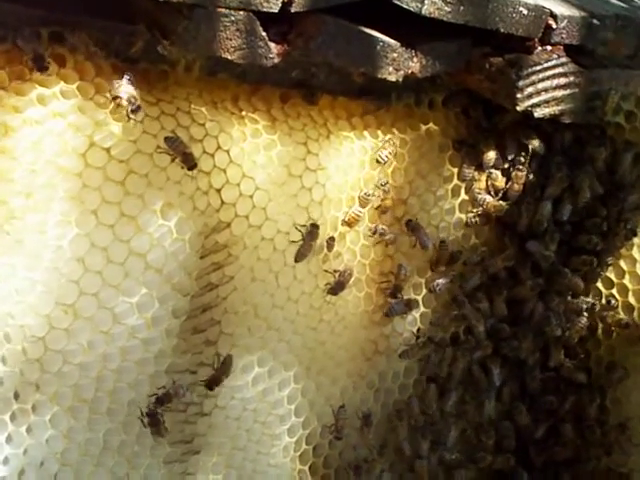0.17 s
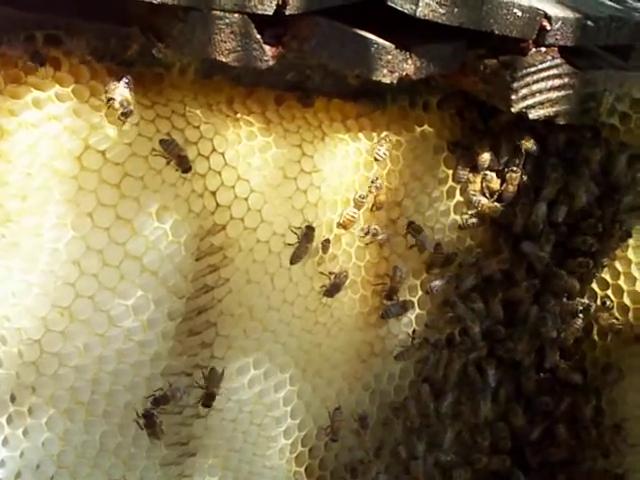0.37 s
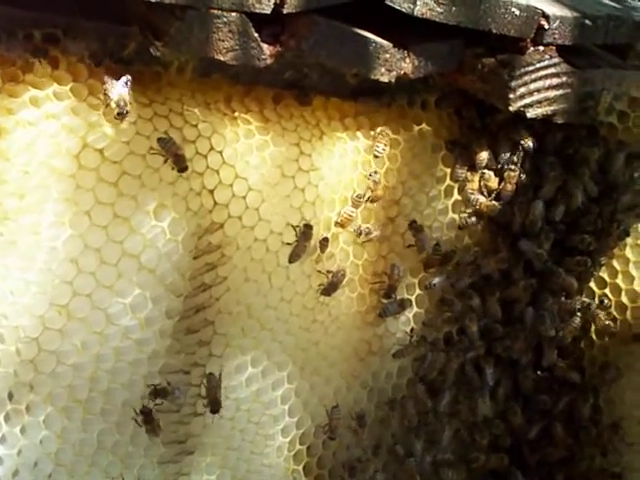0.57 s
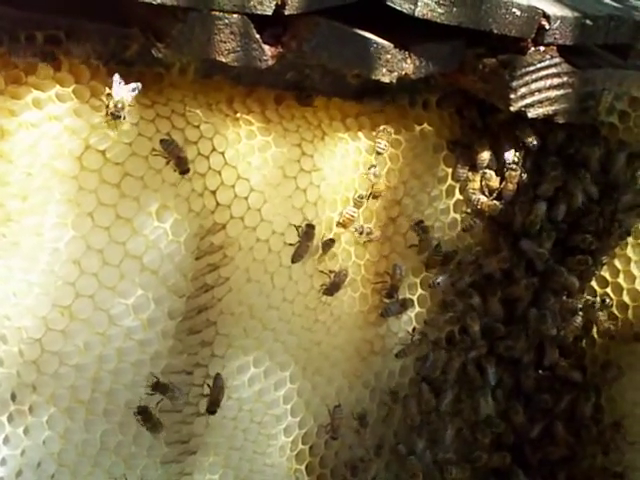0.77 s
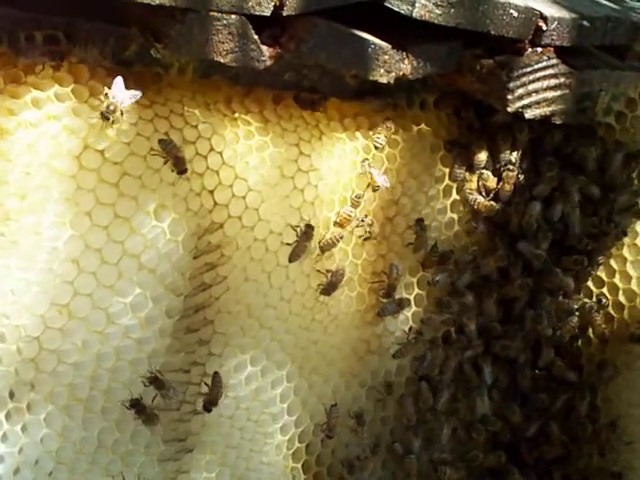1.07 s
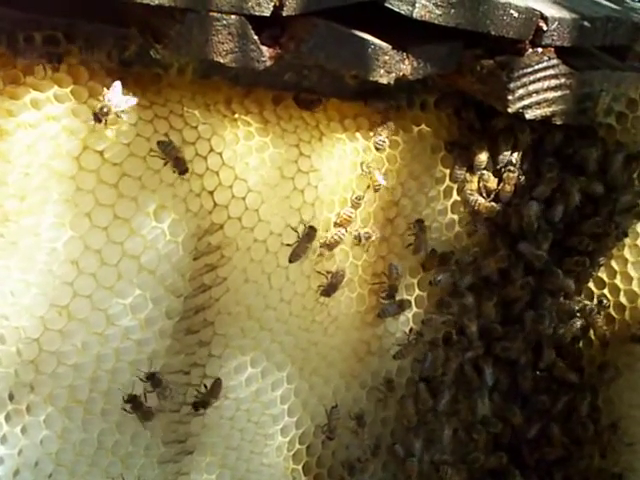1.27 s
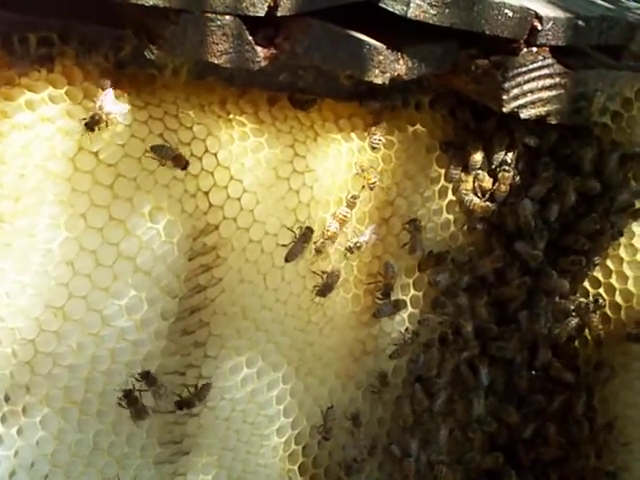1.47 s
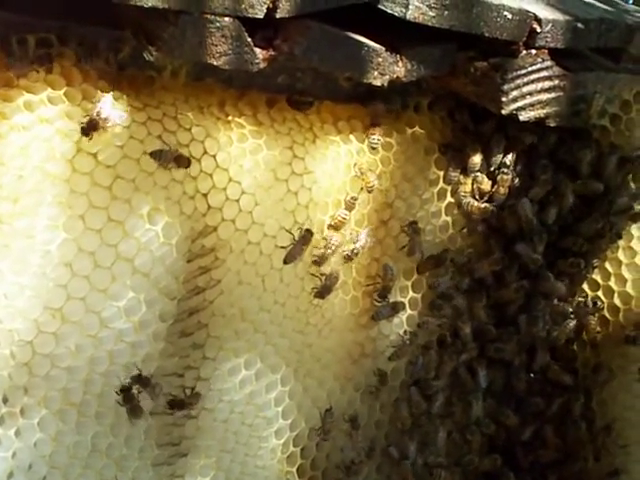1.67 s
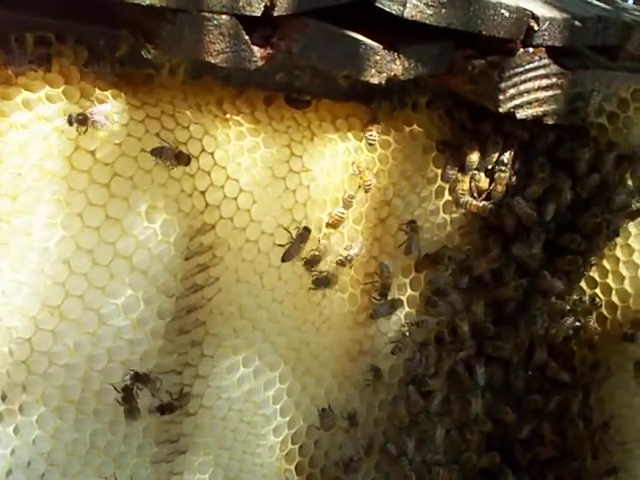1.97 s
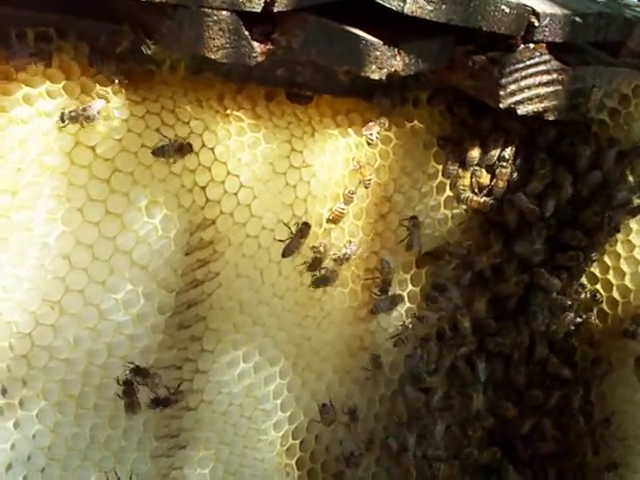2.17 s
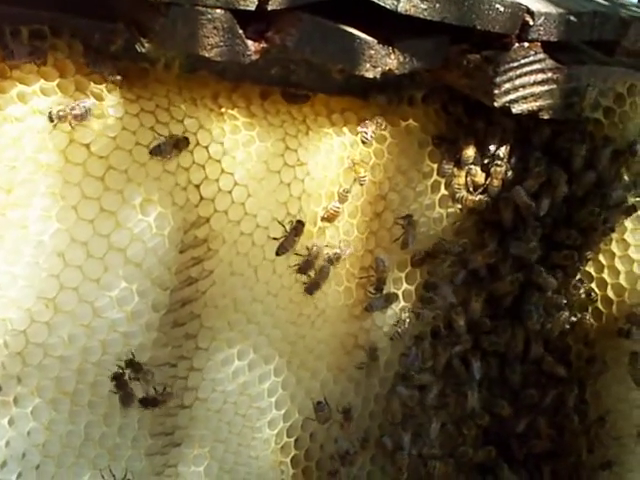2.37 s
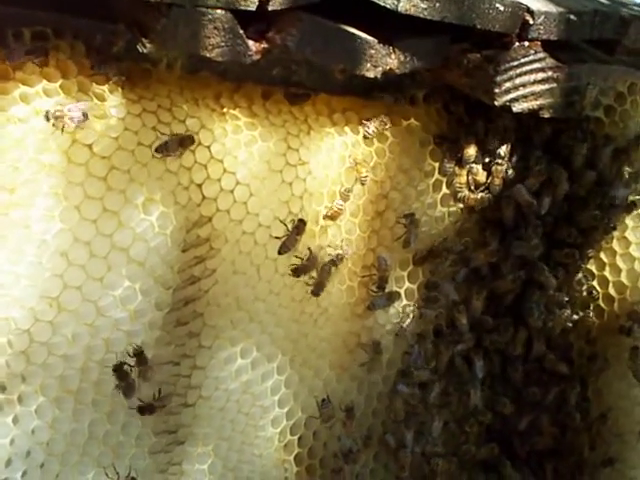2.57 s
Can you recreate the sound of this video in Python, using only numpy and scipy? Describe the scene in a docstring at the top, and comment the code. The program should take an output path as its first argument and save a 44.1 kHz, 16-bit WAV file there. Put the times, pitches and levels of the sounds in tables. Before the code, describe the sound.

Honey bees buzz in a small wooden hive. A close bee pulses in quick low surges from 0 to 0.9 s, dips around 1 s, then buzzes stronger from 1.4 to 2.1 s. At about 2.1 s another darts past, bright and airy, then a round hum gone by 2.3 s. The near bee resumes toward 2.7 s. Colony hum, fine wing rustle, faint rapid knocks and light hiss continue throughout.

```python
"""One bee buzzes in small surges close to the microphone, on the comb inside a wooden hive: wingbeat pulses, filtered.
Another darts past, bright and airy, then a round hum; a second bee nearby wanders about a similar pitch.
Further off, twelve drifting pulse trains make the colony's hum, and noise puffs at each beat its fine wing rustle.
Underneath runs a faint regular knocking, decaying sines, probably the camera's mechanism.
Filtered noise gives the air of the box and a light hiss; a small microphone dulls the treble."""
import sys
import numpy as np
from scipy import signal
from scipy.fft import rfft, irfft, next_fast_len
from scipy.io import wavfile
from scipy.ndimage import uniform_filter1d, map_coordinates

SR = 44100
rng = np.random.default_rng(int(sys.argv[2]) if len(sys.argv) > 2 else 0)


def digitize_waveform(pressure):
    """Quantize a signal to 16-bit integers and store it at the path in sys.argv[1].

    Rows of a 2-D input are taken as channels; values are limited to [-1, 1].
    """
    field = np.atleast_2d(pressure).T
    bounded = np.clip(field, -1, 1)
    quanta = np.round(bounded * 32767).astype(np.int16)
    wavfile.write(sys.argv[1], SR, quanta)


N = 119511

# Near bee on the comb, before its trim: t/s, wingbeat f/Hz, level/dB
NEAR_BEE_SURGES = [(0.0, 201.0, -54), (0.1, 200.0, -57), (0.14, 217.0, -52), (0.19, 203.0, -56),
                   (0.24, 223.0, -50), (0.29, 201.0, -58), (0.33, 216.0, -53), (0.38, 203.0, -55),
                   (0.43, 221.0, -51), (0.48, 204.0, -53), (0.53, 220.0, -54), (0.56, 208.0, -68),
                   (0.6, 222.0, -51), (0.65, 204.0, -54), (0.76, 202.0, -58), (0.81, 208.0, -53),
                   (0.87, 205.0, -59), (1.14, 204.0, -62), (1.21, 215.0, -53), (1.25, 205.0, -55),
                   (1.31, 211.0, -53), (1.34, 210.0, -60), (1.39, 206.0, -49), (1.53, 217.0, -52),
                   (1.59, 199.0, -50), (1.63, 212.0, -52), (1.66, 203.0, -52), (1.7, 216.0, -47),
                   (1.78, 194.0, -56), (1.82, 216.0, -48), (1.85, 208.0, -48), (1.88, 222.0, -47),
                   (1.92, 201.0, -50), (1.96, 221.0, -49), (2.0, 206.0, -49), (2.04, 216.0, -48),
                   (2.08, 202.0, -51), (2.24, 199.0, -59), (2.33, 198.0, -53), (2.41, 202.0, -62),
                   (2.54, 209.0, -50), (2.61, 204.0, -55), (2.69, 209.0, -48)]
# Colour of its wingbeat hum: f/Hz, relative level/dB
NEAR_BEE_COLOUR = [(40, -46.5), (130, -20.5), (208, -9), (415, 1.5), (620, -12), (830, -24), (1500, -38.5),
                   (5000, -79)]
# Its overtones, before they follow the surges: t/s, level/dB
NEAR_OVERTONE_LEVEL = [(0, -58.5), (.2, -55.5), (.63, -56), (.95, -63), (1.25, -62.5), (1.42, -54.5),
                       (1.9, -55.5), (2.05, -58), (2.3, -62), (2.71, -56)]
# Colour of those overtones: f/Hz, relative level/dB
NEAR_OVERTONE_COLOUR = [(200, -47), (450, -18.5), (620, 1), (830, -3), (1040, 1.5), (1250, 2.5),
                        (1460, -0.5), (1700, -11.5), (2700, -17.5), (5000, -40)]
NEAR_TRIM_DB, NEAR_RASP_DB = 1.26, -22.5  # rasp level is relative to the tone
NEAR_JITTER = 0.00803  # share of the wingbeat rate
OVERTONE_FOLLOWS = 0.54  # share of each surge/dB that the overtones follow


def near_bee():
    """Close bee: wingbeat pulses filtered to a hum, with wing-tip rasp and overtones that follow its surges."""
    hz, level_db = surges(NEAR_BEE_SURGES)
    overtones_db, = curves(NEAR_OVERTONE_LEVEL)
    # each surge is measured against the average of a third of a second
    surge_db = level_db - uniform_filter1d(level_db, size=SR // 3)
    beats = wingbeats(hz * (1 + NEAR_JITTER * wobble(90)), scatter_db=1)
    tone = unit(coloured(beats, NEAR_BEE_COLOUR))
    hum = amp(level_db + NEAR_TRIM_DB) * (tone + amp(NEAR_RASP_DB) * rasp(beats))
    overtones = in_box(coloured(beats, NEAR_OVERTONE_COLOUR))
    return hum + amp(overtones_db + OVERTONE_FOLLOWS * surge_db) * overtones


# Bee darting past the microphone:
# t/s, wingbeat f/Hz, overtone level/dB, fundamental level/dB, rasp level/dB
PASSING_BEE_PATH = [(2.04, 203.3, -80, -78, -82), (2.09, 186.7, -54, -66, -61),
                    (2.115, 191, -38, -56, -51.5), (2.14, 194.4, -43, -49.5, -52),
                    (2.165, 202.7, -46.5, -45, -58.5), (2.195, 204.1, -45.5, -48, -71),
                    (2.225, 195, -60, -58, -84), (2.3, 180.3, -77, -70.5, -90)]
# Colour of its overtones: f/Hz, relative level/dB
PASSING_BEE_COLOUR = [(40, -56), (200, -30), (385, 9), (580, -4), (780, -1), (970, -5), (1160, -4.5),
                      (1550, -11), (2500, -17), (5000, -41.5)]
PASSING_AIR_DB, PASSING_HISS_DB = -13, -8.5  # turbulence under its overtones; smooth hiss beside its rasp
PASSING_SCATTER_DB = .5  # from beat to beat


def passing_bee():
    """A bee darts by: bright buzz and airy noise as it nears, a round sine hum as it turns away."""
    hz, overtones_db, fundamental_db, rasp_db = curves(PASSING_BEE_PATH)
    beats = wingbeats(hz * (1 + .02 * wobble(150)), PASSING_SCATTER_DB)
    hum = unit(np.sin(2 * np.pi * np.cumsum(hz) / SR))
    overtones = in_box(coloured(-beats, PASSING_BEE_COLOUR))
    buzz = overtones + amp(PASSING_AIR_DB) * noise(COLONY_HUM_COLOUR)
    wings = rasp(beats, puff_s=0.0011) + amp(PASSING_HISS_DB) * noise(RASP_COLOUR)
    return amp(overtones_db) * buzz + amp(fundamental_db) * hum + amp(rasp_db) * wings


NEIGHBOUR_HZ, NEIGHBOUR_DB = 205.8, -62.5  # centres of its wandering pitch and level
NEIGHBOUR_DRIFT = 0.03204  # share of the wingbeat rate


def neighbour():
    """A second bee nearby: wingbeat pulses wander about one pitch, coloured like the near bee's hum."""
    beats = wingbeats(NEIGHBOUR_HZ * (1 + NEIGHBOUR_DRIFT * wobble(16)), scatter_db=1)
    level = amp(NEIGHBOUR_DB + 2.5 * wobble(5.8))
    return level * unit(coloured(beats, NEAR_BEE_COLOUR))


# Colony hum further off, before random swells: t/s, level/dB
COLONY_LEVEL = [(0, -51), (.5, -52), (.56, -53), (.62, -51.5), (.95, -52.5), (1.25, -51.5), (1.45, -53),
                (2.0, -50.5), (2.3, -52), (2.71, -52)]
# Colour of the colony hum: f/Hz, relative level/dB
COLONY_HUM_COLOUR = [(30, -47), (100, -25), (220, -10.5), (330, -1), (480, 0), (620, 0), (800, -1),
                     (1200, -6), (1600, -9.5), (2200, -15.5), (3200, -23.5), (5000, -38)]
# Fine wing rustle, before random swells: t/s, level/dB
RUSTLE_LEVEL = [(0, -69), (.8, -65.5), (.95, -67.5), (1.06, -62.5), (1.14, -70.5), (1.55, -68), (1.75, -65),
                (2.0, -68), (2.3, -75), (2.71, -67)]
COLONY_HZ, COLONY_SPREAD, COLONY_DRIFT = 224.2, .14, .04  # middle pitch; spread and drift as log pitch
COLONY_SWELL_DB = 1.5  # of each bee
RUSTLE_HZ = 196.5  # middle of the wingbeat behind the rustle


def colony(count=12):
    """Many bees further off: pulse trains, each on its own drifting pitch, over a rustle of puffs."""
    level_db, = curves(COLONY_LEVEL)
    rustle_db, = curves(RUSTLE_LEVEL)
    bees = np.zeros(N)
    for place in np.linspace(-2, 2, count):
        hz = COLONY_HZ * np.exp(COLONY_SPREAD * place + COLONY_DRIFT * wobble(12))
        bees += wingbeats(hz, scatter_db=1.5) * amp(COLONY_SWELL_DB * wobble(8.04))
    hum = amp(level_db + 1.1 * wobble(11.97)) * unit(coloured(bees, COLONY_HUM_COLOUR))
    rustle_beats = wingbeats(RUSTLE_HZ * (1 + .04 * wobble(12)), scatter_db=1.4)
    rustle = rasp(rustle_beats, puff_s=.0007)
    return hum + amp(rustle_db + wobble(21)) * rustle


# Knocks within one cycle, before scatter and colour: t/s, level/dB
CYCLE_KNOCKS = [(0.0137, -48), (0.0796, -46)]
# Ringing modes of the body: f/Hz, time to fall 60 dB t/s, relative level/dB
BODY_MODES = [(125, 0.018, -21), (260, 0.025, -1), (328, 0.028, -0.5)]
# Colour of the knocking: f/Hz, gain level/dB
KNOCKING_COLOUR = [(25, -11.5), (60, -4), (120, 0.5), (380, -0.5), (700, -8.5), (2000, -29.5)]
CYCLE_S, KNOCK_SCATTER_DB = .1, 1


def mechanism():
    """Two dull knocks in every cycle: decaying sines ringing briefly in the camera's body."""
    out = np.zeros(N + SR)
    t = np.arange(SR // 10) / SR
    ring = sum(amp(level - 60 * t / t60) * np.sin(2 * np.pi * hz * t) for hz, t60, level in BODY_MODES)
    for start in np.arange(0, N / SR, CYCLE_S):
        for s, level_db in CYCLE_KNOCKS:
            first = int(abs(start + s) * SR)
            out[first:][:len(t)] += amp(level_db + KNOCK_SCATTER_DB * rng.normal()) * ring
    return coloured(out[:N], KNOCKING_COLOUR)


# Air inside the hive: f/Hz, relative level/dB
AIR_COLOUR = [(15, -20.5), (30, -11.5), (50, -7.5), (80, -2), (200, 1), (600, 6.5), (1500, -7.5),
              (4000, -28.5), (9000, -37)]
AIR_DB, HISS_DB = -58, -62


def air_and_hiss():
    """The low air of the box and a light, bright hiss: two steady filtered noises."""
    return amp(AIR_DB) * noise(AIR_COLOUR) + amp(HISS_DB) * noise(RASP_COLOUR)


# Bright colour shared by wing rasp and hiss: f/Hz, relative level/dB
RASP_COLOUR = [(1500, -18.5), (3000, -7), (4500, -11), (5500, -2.5), (7000, 3.5), (7800, 1), (8400, -9.5),
               (9000, -42.5)]
RASP_SCATTER_DB = 2.5


def rasp(beats, puff_s=0.0008):
    """Wing rasp: a short, decaying puff of bright noise at every wingbeat, at rms 1."""
    puffs = signal.lfilter([1], [1, -np.exp(-1 / (puff_s * SR))], beats)
    flicker = amp(RASP_SCATTER_DB * wobble(150))
    return unit(coloured(puffs * flicker * rng.standard_normal(N), RASP_COLOUR))


def wingbeats(hz, scatter_db):
    """One pulse of air for every wingbeat, each a little different in size."""
    turns = rng.random() + np.cumsum(hz) / SR
    at = np.interp(np.arange(1, int(turns[-1])), turns, np.arange(N))
    size = amp(scatter_db * rng.standard_normal(len(at)))
    # each pulse is shared between the two samples around its exact moment
    i = at.astype(int)
    early = np.bincount(i, size * (1 - at + i), N + 1)
    late = np.bincount(i + 1, size * (at - i), N + 1)
    return (early + late)[:N]


BOX_T60_S, BOX_DB = .03, -5  # the short answer of the wooden walls


def in_box(x):
    """A sound with the hive walls' quick reflections, a decaying noise tail, together at rms 1."""
    t = np.arange(SR // 20) / SR
    highpass = signal.butter(2, 700, "high", fs=SR, output="sos")
    tail = signal.sosfilt(highpass, rng.standard_normal(len(t)))
    tail = tail * amp(-60 * t / BOX_T60_S)
    reflections = signal.fftconvolve(x, tail / np.linalg.norm(tail))[:N]
    return unit(x + amp(BOX_DB) * reflections)


def noise(spectrum):
    """Steady filtered noise of rms 1."""
    return unit(coloured(rng.standard_normal(N), spectrum))


def coloured(x, points):
    """x through a causal minimum-phase filter with these (f/Hz, level/dB) gains."""
    m = 2 * next_fast_len(N // 2 + SR // 8)
    cepstrum = irfft(np.log(amp(along(points, np.fft.rfftfreq(m, 1 / SR)))))
    # fold the cepstrum forward so that nothing sounds before its cause
    cepstrum[1:m // 2] *= 2
    cepstrum[m // 2 + 1:] = 0
    return irfft(rfft(x, m) * np.exp(rfft(cepstrum)))[:N]


def along(points, hz):
    """Interpolates (f/Hz, value) points on a log frequency axis."""
    f, v = np.transpose(points)
    return np.interp(np.log(hz + 1), np.log(f + 1), v)


def curves(rows):
    """One value per sample for each column after the time."""
    s, *cols = np.transpose(rows)
    return [np.interp(np.arange(N) / SR, s, c) for c in cols]


def surges(rows):
    """Like curves, but rounded at every crest and trough."""
    s, *cols = np.transpose(rows)
    place = np.interp(np.arange(N) / SR, s, np.arange(len(s)))
    place = place - np.sin(2 * np.pi * place) / (2 * np.pi)
    return [np.interp(place, np.arange(len(s)), c) for c in cols]


def wobble(rate):
    """A smooth random curve, rate knots a second."""
    knots = rng.standard_normal(int(N * rate / SR) + 4)
    return map_coordinates(knots, [np.arange(N) * rate / SR])


def amp(db):
    """Decibels to gain."""
    return 10 ** (np.asarray(db) / 20)


def unit(x):
    """Scaled to rms 1."""
    return x / np.sqrt(np.mean(x ** 2) + 1e-20)


def scene():
    """Bees near and far, knocking, the air of the box and a light hiss, as one channel."""
    bees = near_bee() + passing_bee() + neighbour() + colony()
    return (bees + mechanism() + air_and_hiss())[None]


# Treble notch of the microphone: f/Hz, gain level/dB
MICROPHONE_RESPONSE = [(3000, -0.5), (3600, -4), (4200, -13), (4800, -1.5), (5400, -2.5)]
TOP_HZ = 8900


def record(dry):
    """A small microphone: a notch in the treble, and nothing passed from TOP_HZ up."""
    m = next_fast_len(N + SR // 4)
    spectrum = rfft(coloured(dry[0], MICROPHONE_RESPONSE), m)
    passed = np.fft.rfftfreq(m, 1 / SR) < TOP_HZ
    return irfft(spectrum * passed, m)[None, :N]


dry = scene()
out = record(dry)
digitize_waveform(out)
```